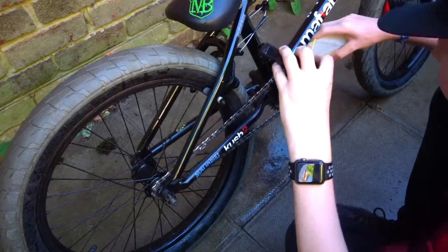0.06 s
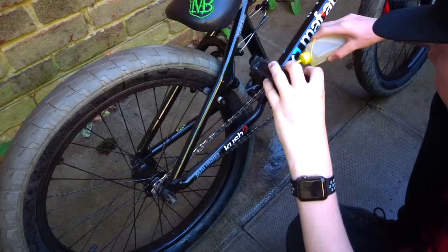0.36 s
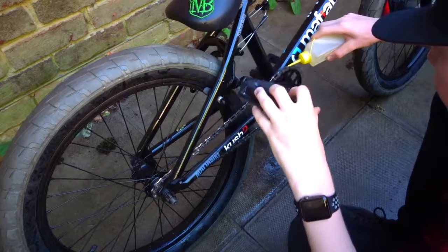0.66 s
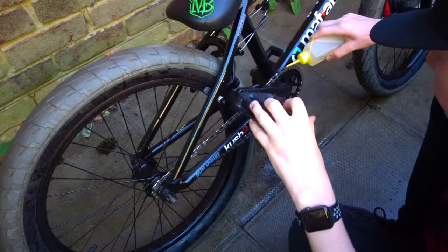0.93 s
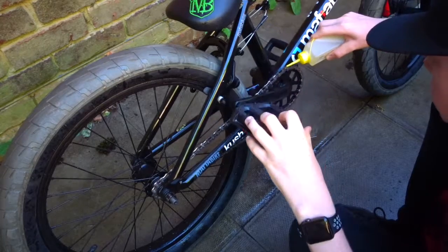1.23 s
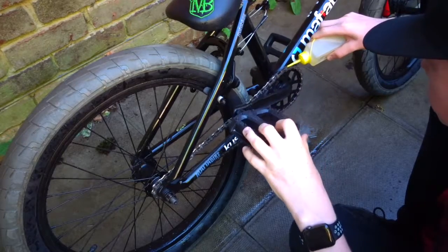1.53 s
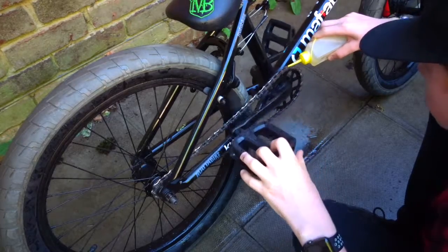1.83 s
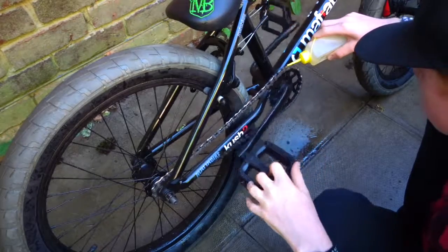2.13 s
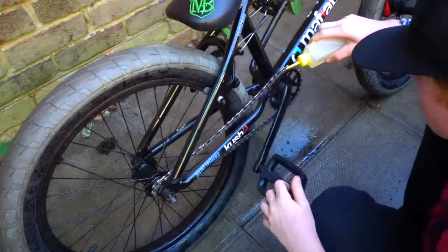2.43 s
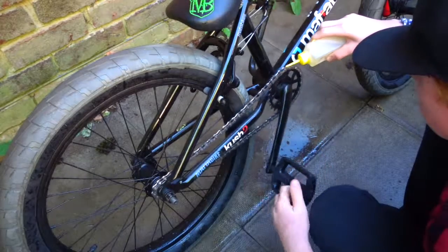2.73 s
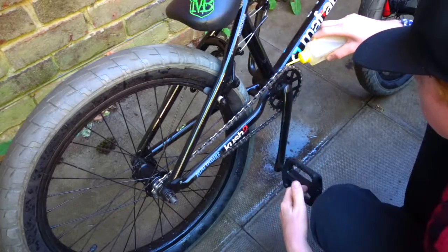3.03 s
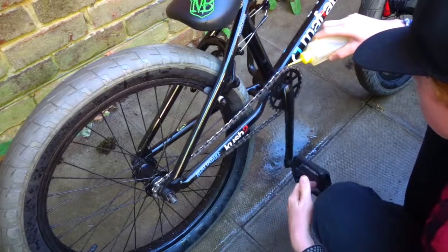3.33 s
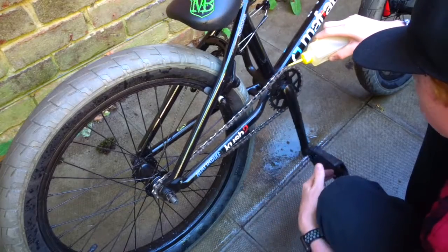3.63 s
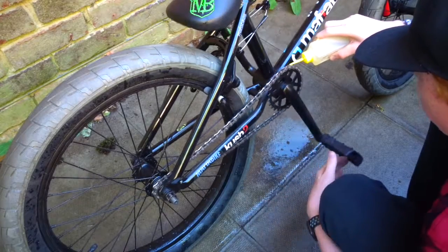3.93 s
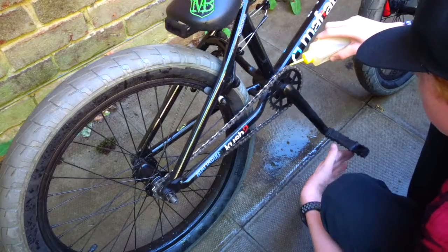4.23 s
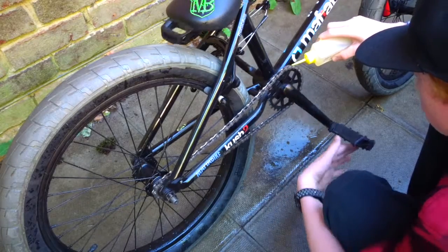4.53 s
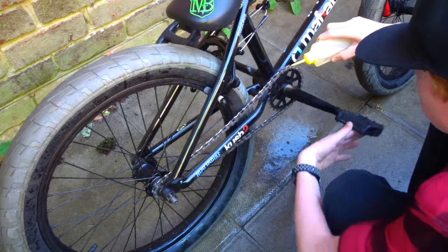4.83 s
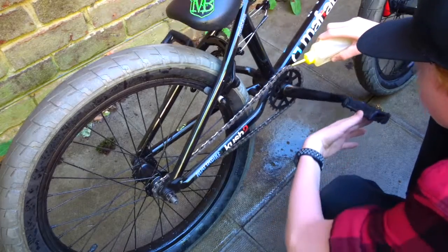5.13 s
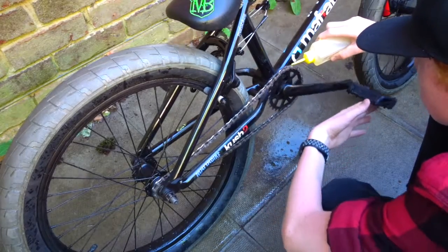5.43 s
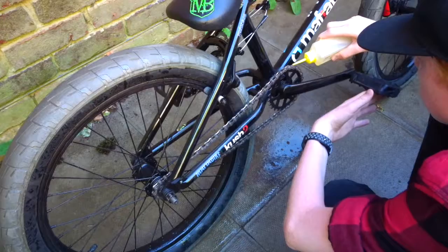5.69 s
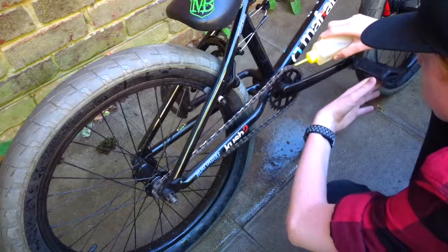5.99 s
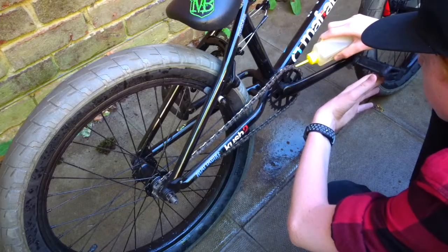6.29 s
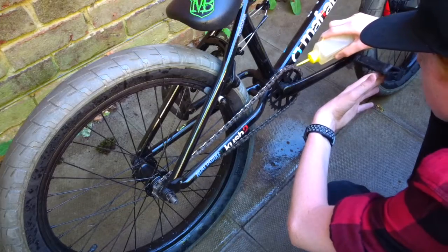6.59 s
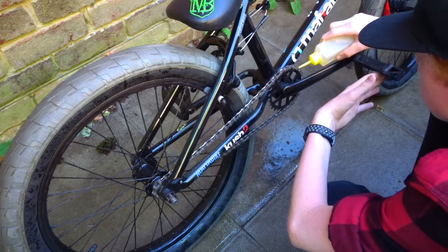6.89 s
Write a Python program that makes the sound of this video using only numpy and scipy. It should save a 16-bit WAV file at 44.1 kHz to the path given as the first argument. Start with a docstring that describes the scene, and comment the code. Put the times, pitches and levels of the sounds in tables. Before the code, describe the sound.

Sharp, metallic ratchet clicks from a slowly back-pedalled bicycle hub, over a lightly pattering chain and far-off traffic.

```python
"""A brick yard, with distant traffic behind and, close up, a bicycle's cranks turned backwards by hand.
The chain ticks softly as its links and rollers seat on the sprockets. The pawls of the rear hub snap
off tooth after tooth, ringing hub, spokes and rim, and paving and wall answer with a short tail.
Near the end a sleeve rustles as the arm shifts."""
import sys
import numpy as np
from scipy import signal
from scipy.fft import rfft, irfft, next_fast_len
from scipy.io import wavfile
from scipy.ndimage import map_coordinates

SR = 44100
rng = np.random.default_rng(int(sys.argv[2]) if len(sys.argv) > 2 else 0)


def wrap_up_sound(samples):
    """Save the sound to the file named by the first command line argument, as 16-bit audio."""
    columns = np.atleast_2d(samples).T
    # keep every value between -1 and 1, then stretch to whole-number steps
    tamed = np.clip(columns, -1, 1)
    steps = np.round(tamed * 32767).astype(np.int16)
    wavfile.write(sys.argv[1], SR, steps)


N = 306495
RING = SR * 2 // 5  # samples that one hit rings for

# Fader ride of the traffic bed: (time [s], relative level [dB])
TRAFFIC_RIDE = [(0.0, -53.5), (1.01, -52.5), (2.44, -53), (5.71, -51.5), (6.95, -52)]
# Tone of the traffic bed and of one far car's tyres: (frequency [Hz], relative density [dB])
TRAFFIC_TONE = [(15, -71), (25, -41), (152, -30.5), (391, -9), (798, -5.5), (907, -2), (1430, -8.5),
                (1630, -11), (2000, -11), (2160, -13), (2780, -11.5), (3000, -13), (3870, -13.5),
                (4510, -15), (11000, -32), (14300, -92), (22000, -120)]
CAR_TONE = [(400, -34), (780, -8), (960, 0), (1180, -7), (2000, -18), (5000, -45)]
# Stereo image of traffic and sleeve: (frequency [Hz], left-right correlation [-1..1])
BED_IMAGE = [(60, 0.97), (140, 0.91), (350, 0.96), (840, 0.87), (2020, 0.58), (4870, -0.19), (11700, -0.11)]
# Faint far hums: (centre time [s], length [s], pitch [Hz], glide [Hz/s], relative level [dB])
FAR_HUMS = [(0.101, 0.31, 364, -120, -59), (0.778, 0.47, 433, 71, -54.5), (2.266, 0.45, 421, -7.5, -62),
            (4.564, 0.82, 397.5, -1, -59.5)]

# Chain links seating on the teeth: (time [s], relative level [dB])
LINK_CUES = [(0.0462, -36.5), (0.055, -36.5), (0.3424, -47.5), (0.476, -43.5), (0.606, -41), (0.675, -38),
             (0.7103, -41), (0.7678, -39), (0.895, -39.5), (1.554, -42), (1.635, -41), (2.619, -36.5),
             (2.892, -38.5)]
# Tone of the chain's clinks and patter: (frequency [Hz], relative density [dB])
CHAIN_TONE = [(300, -66), (1600, -2), (2300, 0.5), (2850, -4.5), (3400, -1), (4600, -3), (5700, 0),
              (6500, -4.5), (8200, -8.5), (11000, -16)]
# Ring of a struck link: (frequency [Hz], relative level [dB], t60 [s])
LINK_RING = [(2354, -7.5, 0.18), (2724, 1.5, 0.051), (3140, -3, 0.14), (5000, -11, 0.05),
             (5520, -5.5, 0.055), (5800, -2, .05), (8200, -19, 0.043)]
# Stereo image of metal hits, then of yard and rollers: (frequency [Hz], left-right correlation [-1..1])
HIT_IMAGE = [(2800, 0.92), (3500, 0.32), (6000, -0.0068), (8000, -0.065), (11000, -0.23)]
YARD_IMAGE = [(1500, 0.41), (2800, 0.83), (4000, 0.76), (6000, -0.36), (11000, 0.077)]
# Reverb time of paving and brick: (frequency [Hz], t60 [s])
YARD_T60 = [(500, 0.69), (3000, 0.21), (6000, 0.24), (11000, 0.28)]

# Pawl drops, one a tooth; tilt favours the wheel's upper resonance over its lower one:
# (time [s], relative level [dB], tilt [dB])
PAWL_CUES = [(0.155, -35, 2), (0.3996, -36.5, 7), (0.513, -32.5, -8), (0.6235, -32.5, -4),
             (0.779, -33.5, 12), (1.0338, -33.5, 8), (1.2815, -32, 3), (1.5756, -31.5, 5), (1.745, -31, 1),
             (1.8425, -31, 10), (1.9257, -31, 10), (1.9992, -30.5, 7), (2.0644, -30, -5),
             (2.1278, -30.5, -4), (2.19, -29.5, -5), (2.2575, -30.5, -7), (2.3257, -30, -7),
             (2.403, -31, -6), (2.4773, -31.0, -4), (2.5596, -32.5, -1), (2.652, -31.5, -4.6),
             (2.8211, -31, -2), (2.992, -30, -4), (3.1457, -31, -1), (3.2913, -34, -1), (3.402, -34, 2),
             (3.49, -31.5, -4), (3.578, -29.5, -5), (3.655, -30.8, -1), (3.737, -30.5, -1.9),
             (3.8272, -29.5, 9), (3.9334, -29.5, 6.5), (4.089, -30.5, 9.5), (4.4417, -32.5, 1.6),
             (4.5926, -31.1, 5.5), (4.734, -31, -1), (4.8809, -32, 15.5), (5.018, -32.5, -2),
             (5.153, -33, 4), (5.282, -33, -1.6), (5.433, -33, -10), (5.5799, -33, -9.5),
             (5.711, -33.5, -5), (5.8351, -32.5, -5), (5.982, -33, -1)]
# Crowded modes of hub shell, sprocket and spokes: (frequency [Hz], relative density [dB])
SHELL_TONE = [(100, -45), (700, -27), (1550, -20.5), (2100, -3), (2700, -4.5), (3050, -6.5), (3700, 0),
              (4300, -5), (5000, -2), (6000, -4.5), (6700, -6.5), (9000, -12), (10000, -12.5), (10900, -16)]
# Ring time of those crowded modes: (frequency [Hz], t60 [s])
SHELL_T60 = [(2000, 0.17), (4000, 0.048), (10000, 0.1)]
# Clear modes of hub and pawls, then of rim and spokes: (frequency [Hz], relative level [dB], t60 [s])
HUB_RING = [(4478, -6, .08), (4688, -9, .08), (4764, -8, .15), (4931, -5, .07), (5189, -3, .06),
            (5410, -2, .06), (5706, -6, .07), (5870, -6, .06), (5991, -3, .08), (6599, -8, .06),
            (6804, -8, .06), (7080, -7, .04), (7342, -6, .04), (8080, -11, .04), (8360, -8, .04),
            (8769, -9, .04), (9162, -7, .045), (10739, -8, .04)]
WHEEL_RING = [(1394, -23, .12), (1792, -15, .09), (1878, -15, .1), (1975, -8, .11), (2075, -4, .11),
              (2130, -13, .2), (2193, -3, .11), (2347, -10, .1), (2395, -9, .1), (2449, -8, .11),
              (2497, -7, .09), (2589, 1, .115), (2653, -9, .1), (2697, -8, .09), (2850, 1, .08),
              (2885, -7, .1), (3176, -8, .08), (3348, -20, .55), (3434, -18, .3), (3601, -8, .15),
              (3660, -3, .11), (3750, -5, .06), (3886, -4, .07), (4048, -9, .1), (4112, -13, .3)]
# Low cut that keeps the clicks free of low thumps: (frequency [Hz], gain [dB])
CLICK_LOW_CUT = [(100, -11.5), (600, -0.5)]

# Strokes of the sleeve: (peak time [s], level [dB])
SLEEVE_CUES = [(5.335, -44.5), (5.57, -48)]
# Tone of the cloth and of the shifting body: (frequency [Hz], relative density [dB])
SLEEVE_TONE = [(60, -25), (200, -19), (400, -2), (900, 3), (1700, -2.5), (3000, -11), (6000, -33),
               (11000, -39)]
RUMBLE_TONE = [(25, -20), (60, -10), (82, 0), (110, -9), (138, 0), (230, -10), (500, -60)]
# Soft low bumps: (centre time [s], pitch [Hz], level [dB])
BUMP_CUES = [(5.67, 80, -70), (5.76, 134, -70), (6.02, 135, -74)]

# Balance of the microphone pair: (frequency [Hz], left over right [dB])
PAIR_BALANCE = [(150, .3), (1000, 0.4), (2200, 1.1), (4000, -.2), (8000, -1.1), (11000, -1)]
# Head start of the left microphone: (frequency [Hz], lead [s])
LEFT_LEAD = [(20, 2e-5), (2500, 2e-5), (6000, 0)]


def amp(db):
    """Decibels to gain."""
    return 10 ** (np.asarray(db) / 20)


def unit(x):
    """x at rms 1."""
    return x / np.sqrt(np.mean(x ** 2) + 1e-20)


def along(points, hz):
    """Read (frequency [Hz], value) points on a log axis."""
    f, v = np.transpose(points)
    return np.interp(np.log(hz + 1), np.log(f + 1), v)


def curve(rows):
    """Automation: (time [s], value) rows as one value a sample."""
    return np.interp(np.arange(N) / SR, *np.transpose(rows))


def arch(s, length):
    """A rise and fall centred on time s."""
    return np.cos(np.pi * np.clip((np.arange(N) / SR - s) / length, -.5, .5))


def wobble(rate):
    """A smooth random curve, rate knots a second."""
    return map_coordinates(rng.standard_normal(int(N * rate / SR) + 4), [np.arange(N) * rate / SR])


def fade(t, t60):
    """Free decay of a vibration."""
    return np.exp(-np.log(1000) * t / t60)


def bell(hz, centre_hz, width_hz):
    """An EQ bell of height 1."""
    return np.exp(-((hz - centre_hz) / width_hz) ** 2)


def eq(x, response):
    """Filter x with a gain given as a function of frequency."""
    n = x.shape[-1]
    m = next_fast_len(n + 4096)
    return irfft(rfft(x, m) * response(np.fft.rfftfreq(m, 1 / SR)), m)[..., :n]


def width(image, hz):
    """Stereo width as an angle: 0 is mono, pi is out of phase."""
    return np.arccos(np.clip(along(image, hz), -1, 1))


def noise(n, tone, image):
    """Stereo noise at rms 1 with a given tone and image."""
    def mid_side(hz):
        angle = width(image, hz) / 2
        return amp(along(tone, hz)) * [np.cos(angle), np.sin(angle)]
    mid, side = eq(rng.standard_normal((2, n)), mid_side)
    return unit(np.array([mid + side, mid - side]))


def damped(x, decay):
    """Let each frequency of x die at its own speed."""
    hz, t, bands = signal.stft(x, SR, nperseg=128)
    bands = bands * fade(t, along(decay, hz)[:, None])
    return signal.istft(bands, SR, nperseg=128)[1][:, :x.shape[1]]


def add(track, s, sound):
    """Mix a sound into the track at time s."""
    i = max(round(s * SR), 0)
    track[:, i:i + sound.shape[1]] += sound[:, :max(N - i, 0)]


def traffic(trim_db=2):
    """A bed of distant traffic; one far car's tyres swell out of it at the end."""
    bed = amp(curve(TRAFFIC_RIDE) + trim_db) * noise(N, TRAFFIC_TONE, BED_IMAGE)
    car = amp(-57) * arch(s=6.7, length=2) * noise(N, CAR_TONE, BED_IMAGE)
    return bed + car


def far_hums():
    """Faint gliding tones come and go, rough in pitch and level."""
    t = np.arange(N) / SR
    out = np.zeros(N)
    for s, length, hz, glide, db in FAR_HUMS:
        pitch = (hz + glide * (t - s)) * (1 + .03 * wobble(60))
        flutter = .85 + .5 * wobble(50)
        out += amp(db) * flutter * arch(s, length) * np.sin(2 * np.pi * np.cumsum(pitch) / SR)
    return out


def tooth_rate():
    """Hub speed from the gaps between pawl drops: (time [s], rate [teeth/s])."""
    s = np.array(PAWL_CUES)[:, 0]
    return np.column_stack([(s[1:] + s[:-1]) / 2, 1 / np.diff(s)])


def chain_rollers(ticks_per_s=70, start_s=0.374, stop_s=6.12, usual_teeth_per_s=11.1):
    """A ring is already dying away as the sound begins; then the rollers patter and rub, louder with speed."""
    ticks = (rng.random(N) < ticks_per_s / SR) * amp(5.5 * np.clip(rng.standard_normal(N), -2, 2))
    tick_decay = fade(np.arange(RING) / SR, t60=0.087)
    patter = np.sqrt(np.abs(signal.fftconvolve(ticks ** 2, tick_decay ** 2)[:N]))  # energies add
    rub = patter.mean()
    running = [row for row in tooth_rate() if start_s < row[0] < stop_s]
    speed = curve([(start_s, 0), *running, (stop_s, 0)]) / usual_teeth_per_s
    opening_ring = amp(-42.5) * fade(np.arange(N) / SR, t60=0.35)
    level = opening_ring + amp(-54) * speed ** 0.35
    return level * unit(patter + rub) * noise(N, CHAIN_TONE, YARD_IMAGE)


def metal_ring(modes, scatter_db, lead_rad):
    """Each hit rings the modes at new strengths; high ones reach the two sides out of step."""
    hz, db, t60 = np.transpose(modes)
    t = np.arange(RING) / SR
    strength = amp(db + scatter_db * rng.standard_normal(len(hz)))
    start_phase = np.exp(2j * np.pi * rng.random(len(hz)))
    skew = lead_rad + width(HIT_IMAGE, hz) * rng.standard_normal(len(hz))
    stereo = strength * start_phase * np.exp(.5j * np.array([skew, -skew]))
    partials = np.exp(2j * np.pi * hz[:, None] * t) * fade(t, t60[:, None])
    return (stereo @ partials).real


def yard_reverb(x, wet_db, build_s):
    """A hit plus the short tail that paving and brick wall scatter back."""
    tail = damped(noise(RING, [(100, 0), (11000, 0)], YARD_IMAGE), YARD_T60)
    tail *= 1 - np.exp(-(np.arange(RING) / SR / build_s) ** 2)
    tail /= np.linalg.norm(tail[0])
    return x + amp(wet_db) * signal.fftconvolve(x[:1], tail, axes=1)[:, :RING]


def chain_links(trim_db=-7, attack_s=0.00037):
    """Now and then a link seats on a tooth with a clear clink."""
    t = np.arange(RING) / SR
    attack = 1 - np.exp(-t / attack_s)
    out = np.zeros((2, N))
    for s, db in LINK_CUES:
        burst = noise(RING, CHAIN_TONE, HIT_IMAGE) * fade(t, t60=0.1)
        ring = amp(1.5) * metal_ring(LINK_RING, scatter_db=3, lead_rad=0.1)
        clink = yard_reverb((burst + ring) * attack, wet_db=-16, build_s=0.0043)
        add(out, s, amp(db + trim_db) * clink)
    return out


def pawl_drop(spread_s, slip_s, pawls=3, swell_s=0.0021):
    """The pawls slip off their teeth and land in turn, each with a crack that rings hub and wheel."""
    t = np.arange(RING) / SR
    landings = np.linspace(0, spread_s, pawls) + np.r_[0, rng.uniform(0, .0006, pawls - 1)]
    energy = amp(rng.normal(0, 1.6, pawls)) ** 2
    since = t - slip_s - landings[:, None]
    age = np.maximum(since, 0)
    delivered = (since >= 0) * (energy / energy.sum())[:, None]  # each pawl's share once landed
    drive = np.sqrt(delivered.sum(0))
    slip = amp(-9) * (t < slip_s) * t / slip_s
    cracks = amp(4.5) * np.sqrt(np.sum(delivered * fade(age, t60=0.022) ** 2, 0))
    shell = drive * damped(noise(RING, SHELL_TONE, HIT_IMAGE), SHELL_T60)
    hub = amp(-8.5) * drive * metal_ring(HUB_RING, scatter_db=3.5, lead_rad=0.77)
    # fed through the spokes, the rim takes a moment to bloom
    bloom = np.sqrt(np.sum(delivered * (1 - np.exp(-age / swell_s)), 0))
    wheel = amp(-5.5) * bloom * metal_ring(WHEEL_RING, scatter_db=1.5, lead_rad=0.15)
    transient = (slip + cracks) * noise(RING, SHELL_TONE, HIT_IMAGE)
    return transient + shell + hub + wheel


def ratchet(trim_db=3.5, usual_db=-31.5, slip_s=0.002):
    """One click a tooth: hard ones are tight, soft ones ragged with more knock; speed raises the ping."""
    out = np.zeros((2, N))
    speed = tooth_rate()
    for s, db, tilt_db in PAWL_CUES:
        accent_db = db - usual_db
        spread_s = 0.002752 * 2 ** (-accent_db / 4.5)  # halves for each 4.5 dB harder
        chime_db = 0.61 * tilt_db  # the wheel's upper resonance
        knock_db = chime_db - tilt_db - 1.03 * accent_db  # its lower one
        ping_hz = 4760 + 73 * np.interp(s, *speed.T)  # the hub's ping
        click = eq(pawl_drop(spread_s, slip_s), lambda hz: amp(
            along(CLICK_LOW_CUT, hz)
            + knock_db * bell(hz, centre_hz=2070, width_hz=240)
            + chime_db * bell(hz, centre_hz=2660, width_hz=140)
            + 3.5 * bell(hz, centre_hz=ping_hz, width_hz=440)))
        add(out, s - slip_s, amp(db + trim_db) * yard_reverb(click, wet_db=-12.5, build_s=0.0099))
    return out


def sleeve(attack_s=0.02, release_t60=0.68, grain_db=2):
    """Cloth brushes as the arm shifts, over the body's low rumble and a few soft bumps."""
    t = np.arange(N) / SR
    strokes = np.zeros(N)
    for s, db in SLEEVE_CUES:
        attack = np.exp(np.minimum(t - s, 0) / attack_s)
        strokes += amp(db) * attack * fade(np.maximum(t - s, 0), release_t60)
    cloth = strokes * amp(grain_db * wobble(90)) * noise(N, SLEEVE_TONE, BED_IMAGE)
    rumble = amp(-75) * arch(s=5.75, length=0.95) * noise(N, RUMBLE_TONE, BED_IMAGE)
    bumps = sum(amp(db) * arch(s, length=0.14) ** 2 * np.sin(2 * np.pi * hz * (t - s))
                for s, hz, db in BUMP_CUES)
    return cloth + rumble + bumps


def scene():
    """The mix at the two microphones: bicycle and sleeve up front, the town behind."""
    return traffic() + far_hums() + chain_rollers() + chain_links() + ratchet() + sleeve()


def record(dry, high_cut_hz=11060):
    """The left microphone hears a touch sooner, the right one brighter; both have a steep high cut."""
    sides = np.array([[1], [-1]])

    def response(hz):
        balance = amp(sides * along(PAIR_BALANCE, hz) / 2)
        timing = np.exp(1j * np.pi * hz * along(LEFT_LEAD, hz) * sides)
        return balance * timing / np.sqrt(1 + (hz / high_cut_hz) ** 150)
    return eq(dry, response)


dry = scene()
out = record(dry)
wrap_up_sound(out)
```